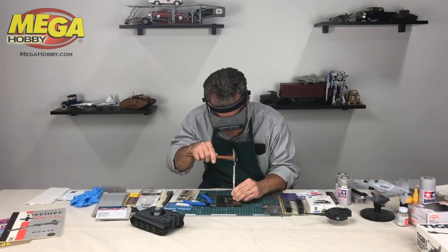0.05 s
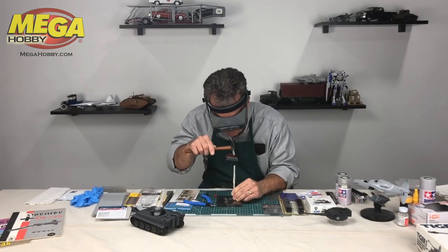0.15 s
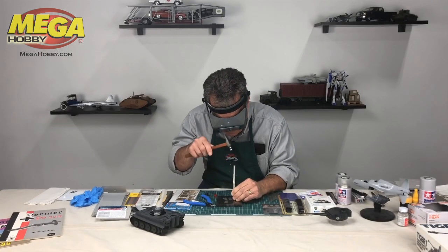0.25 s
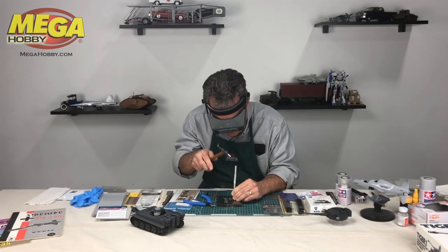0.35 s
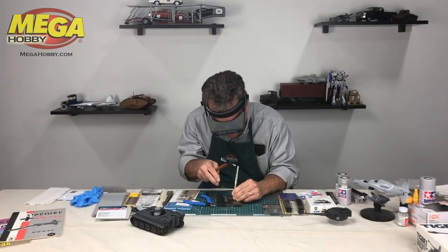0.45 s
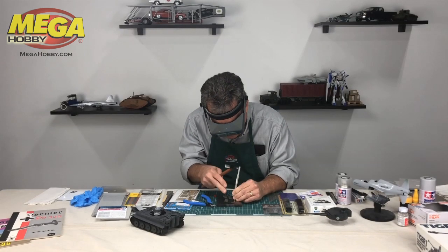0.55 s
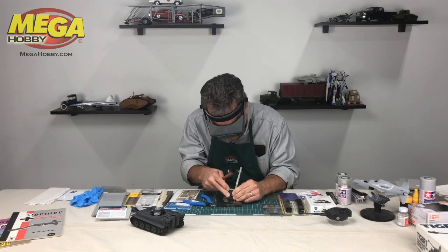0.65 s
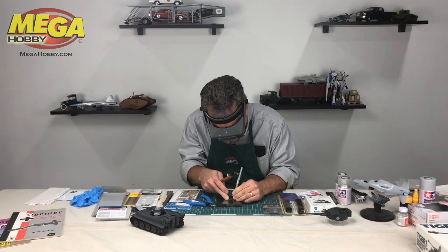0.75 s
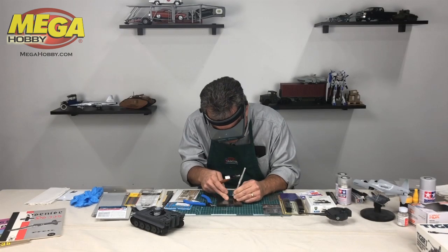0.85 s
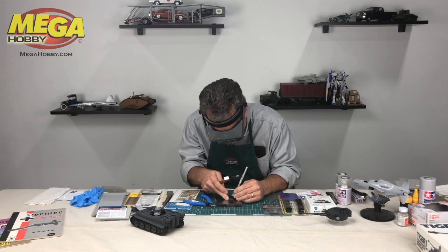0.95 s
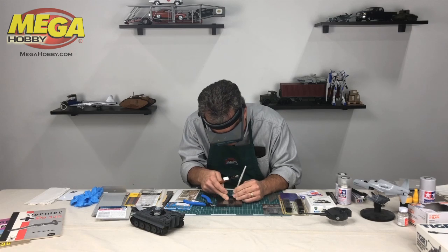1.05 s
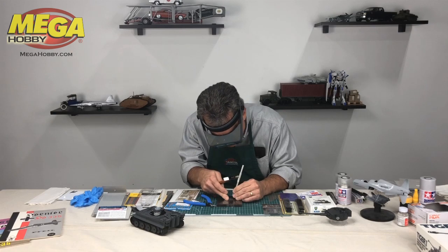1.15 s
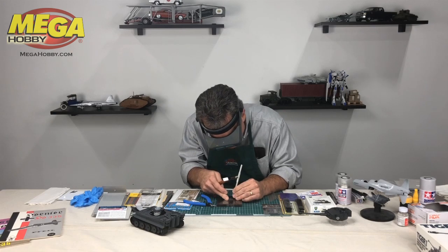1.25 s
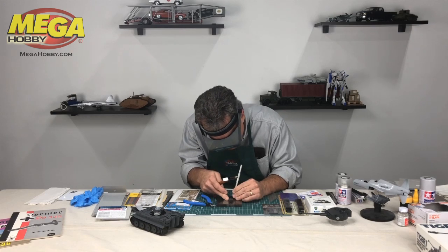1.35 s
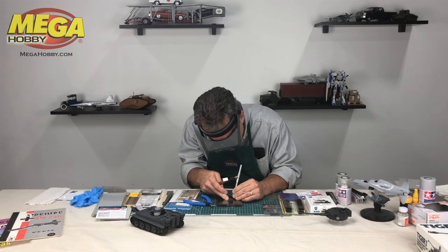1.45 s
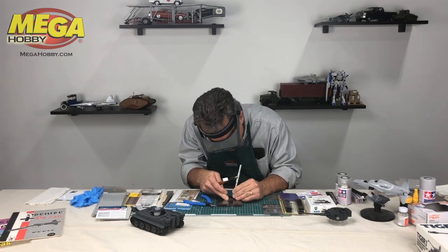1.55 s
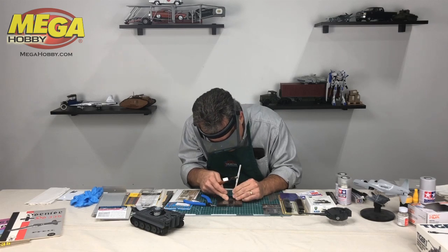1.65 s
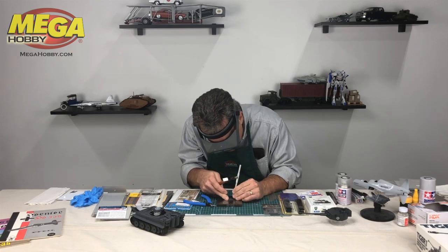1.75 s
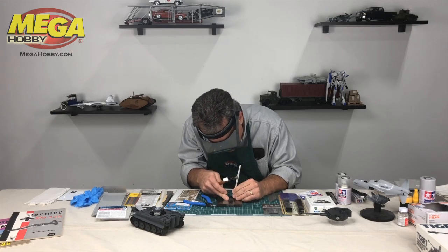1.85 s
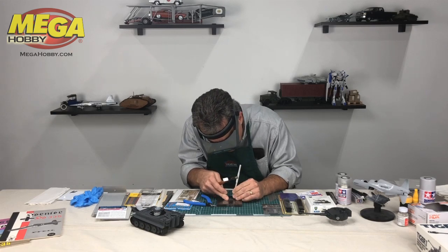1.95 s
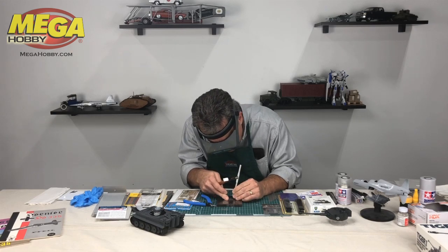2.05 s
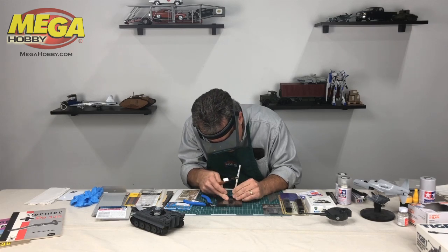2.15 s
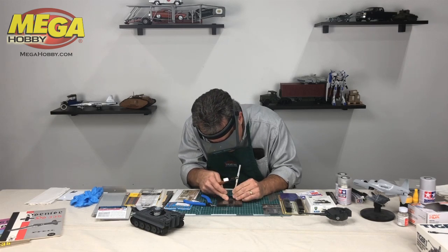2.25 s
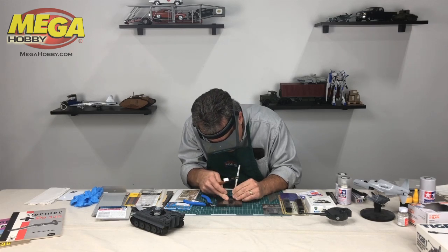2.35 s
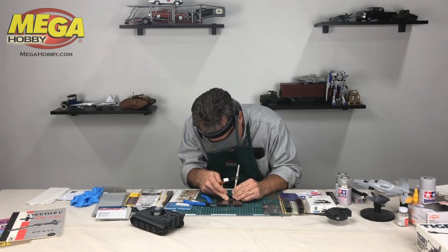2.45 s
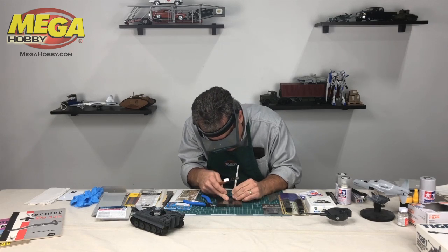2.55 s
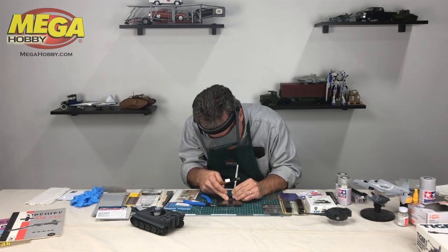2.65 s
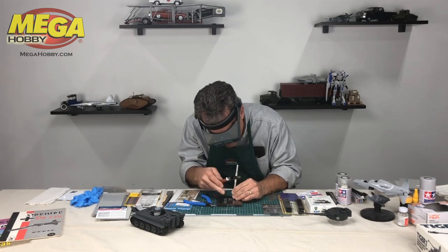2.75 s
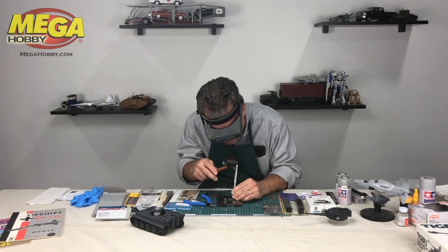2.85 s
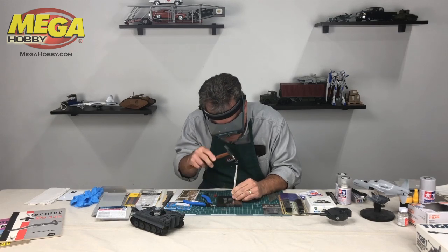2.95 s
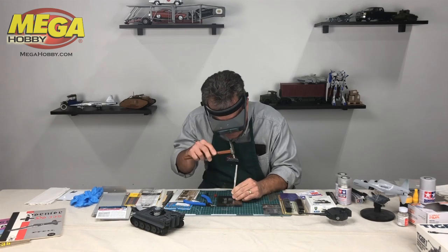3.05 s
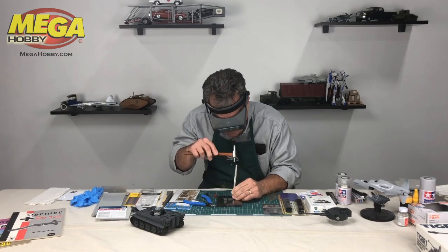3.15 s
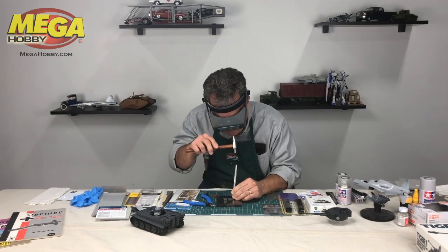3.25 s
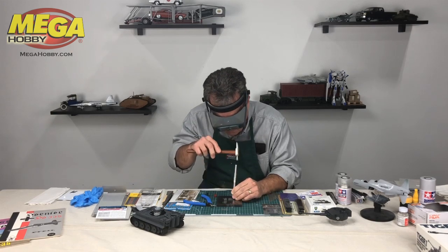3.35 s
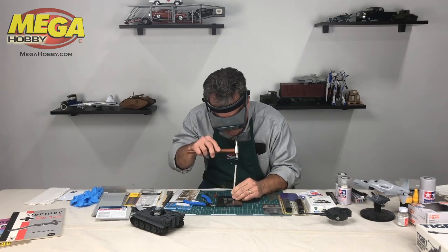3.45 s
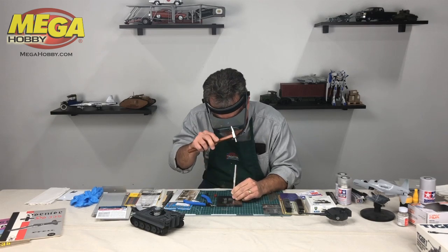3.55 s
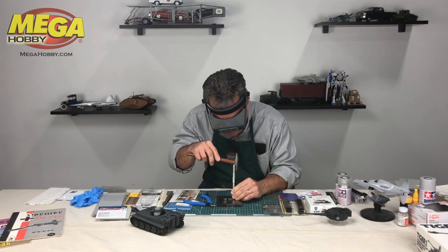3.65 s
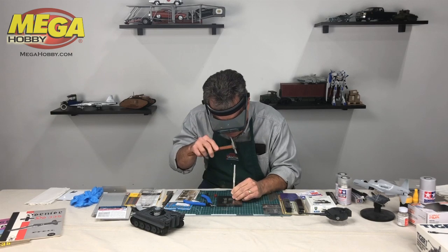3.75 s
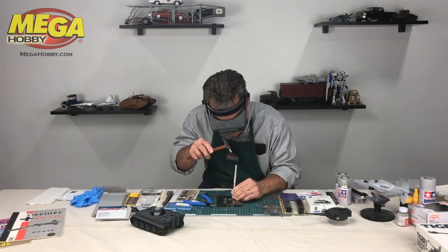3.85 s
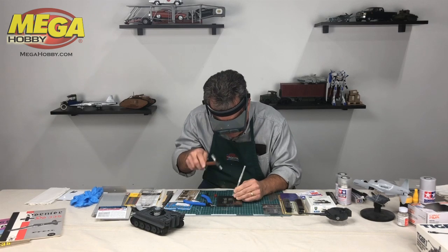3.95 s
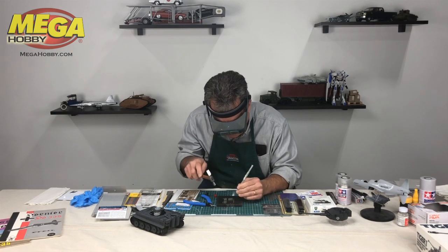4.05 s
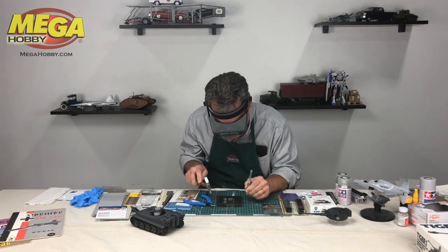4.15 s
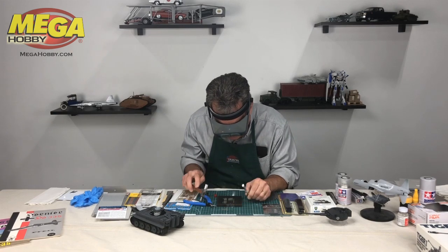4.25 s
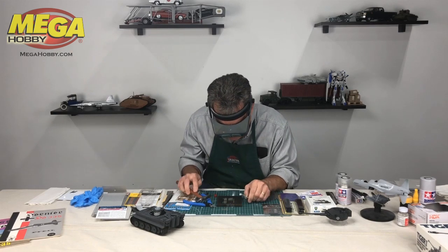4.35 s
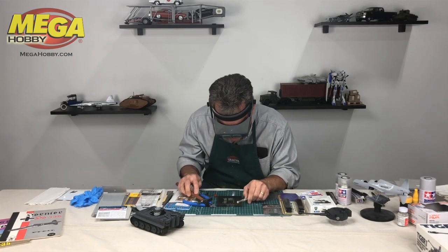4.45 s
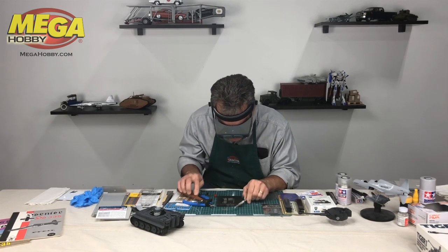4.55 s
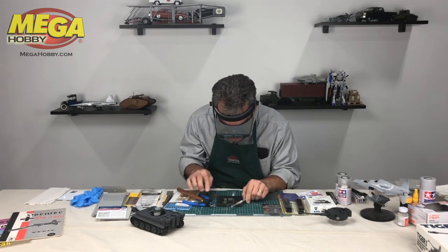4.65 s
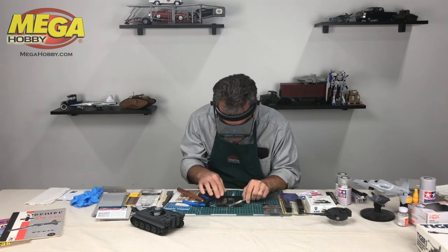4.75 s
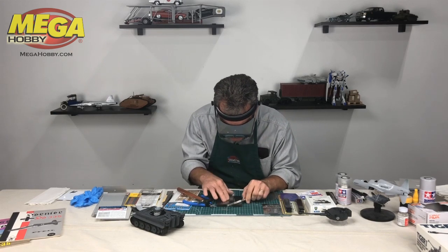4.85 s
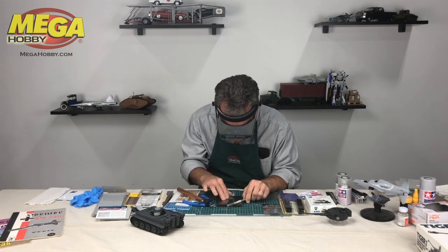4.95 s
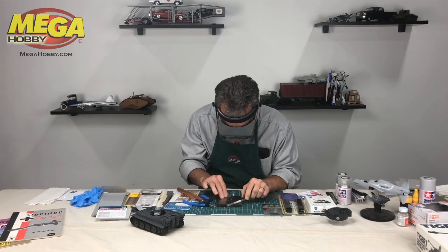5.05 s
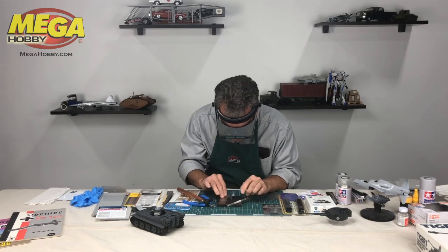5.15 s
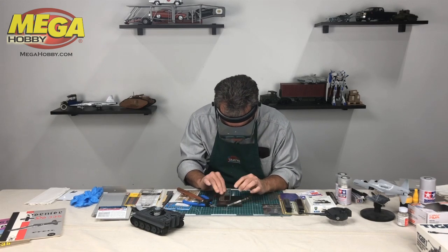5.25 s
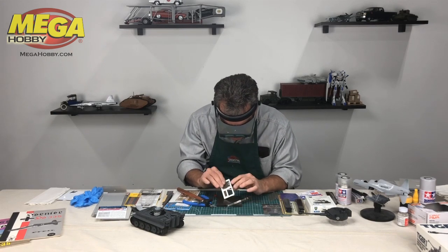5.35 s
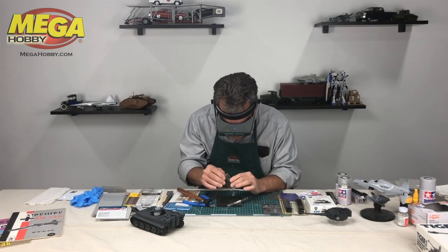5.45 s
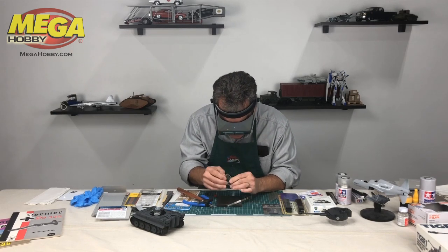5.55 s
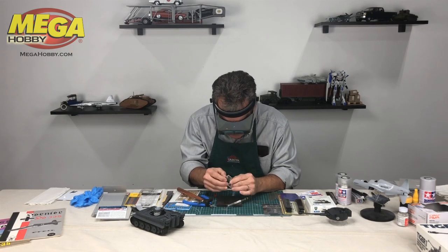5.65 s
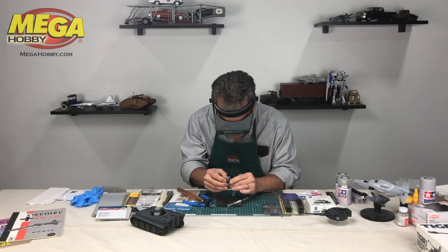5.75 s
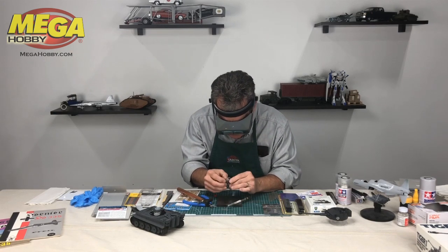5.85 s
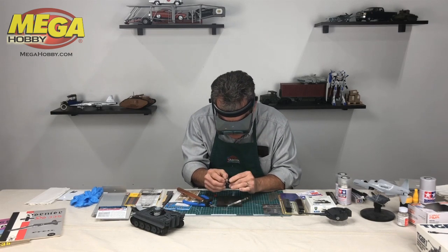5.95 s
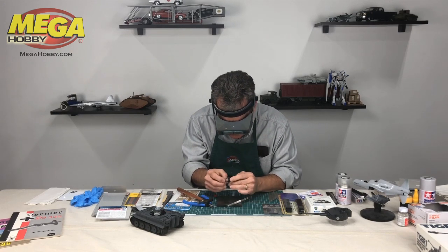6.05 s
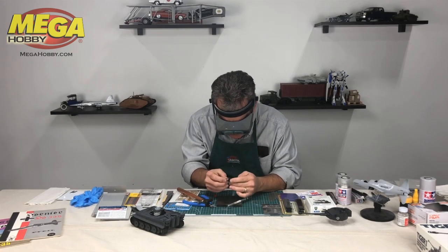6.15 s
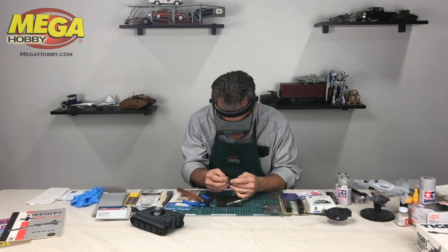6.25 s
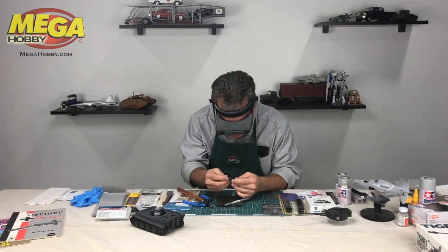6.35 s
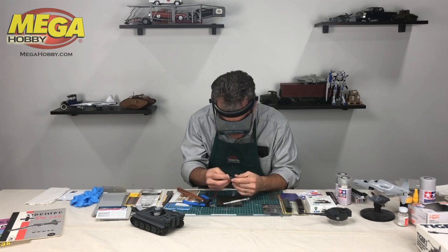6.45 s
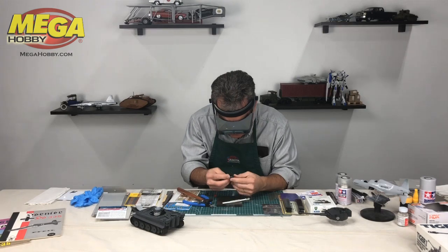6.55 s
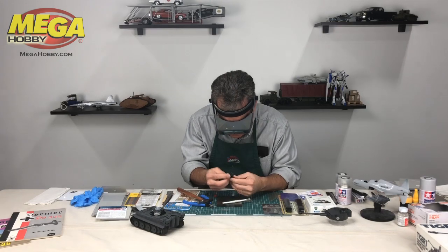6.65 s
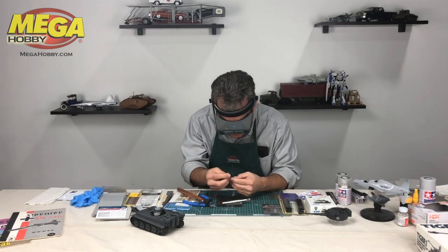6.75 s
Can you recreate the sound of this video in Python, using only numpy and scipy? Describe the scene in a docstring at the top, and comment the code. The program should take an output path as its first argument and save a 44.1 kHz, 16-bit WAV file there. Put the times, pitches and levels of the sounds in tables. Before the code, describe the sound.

A loud, dry steel crack with a brief bench boom opens the scene, clipped and harsh, its echo fading indoors. Tiny ticks and scrapes come after it, then almost three seconds of near silence. A lighter strike leads straight into another violent blow. Soft thuds and a bright metallic clink mark tools being put down on a mat, followed by very faint fiddling with thin metal, over steady low fan rumble and thin mains buzz.

```python
"""A workbench in a plain room: a small hammer drives a chisel blade onto a metal plate with three blows.
The hard blows overload the microphone. The blade ticks and chatters on the plate as short bursts and damped modes.
Then the tools are laid on a soft mat and rock to rest; fingers handle a small metal part, its modes muted and bent.
Noise-built echoes and a few standing waves answer from the room, over ventilation rumble and a faint mains buzz."""
import sys
import numpy as np
from scipy import signal
from scipy.fft import rfft, irfft
from scipy.io import wavfile
from scipy.ndimage import uniform_filter1d

SR = 44100
rng = np.random.default_rng(int(sys.argv[2]) if len(sys.argv) > 2 else 0)


def unload_wav(signal):
    """Save mono or channel-first audio to the path in sys.argv[1] as 16-bit WAV at rate SR, clipped to [-1, 1]."""
    wavfile.write(
        sys.argv[1],
        SR,
        np.round(np.clip(np.atleast_2d(signal).T, -1, 1) * 32767).astype(np.int16),
    )


N = 299747

# hammer blows: [t/s, plate knock level/dB, bench boom level/dB, steel crack level/dB, blade ring level/dB]
BLOWS = [(0.0454, 0.5, 2, 2.5, -30.5), (3.3975, -8.5, -10, -18, -26), (3.6429, 4.5, 2.5, 0.5, -22.5)]
# blade ticks on the plate, or chatters there after a hard blow:
# [t/s, crack level/dB, ring level/dB, gap between contacts/s, count of contacts]
TICKS = [(.056, -13, -34, .007, 1), (0.5697, -20.5, -31, .007, 1), (0.6561, -20, -31, 0.0065, 2),
         (3.651, -21, -31, .0052, 2), (3.671, -17, -38, 0.0082, 3)]
# tools and hands land on the mat:
# [t/s, knock level/dB, crack level/dB, handle ring level/dB, first gap/s, count of contacts]
LANDINGS = [(4.3129, -41.5, -62, -75, .017, 1), (4.320, -38.5, -64, -75, .018, 2),
            (4.406, -29.5, -41, -56, 0.017, 4), (4.516, -42, -60, -78, .017, 1),
            (4.566, -30, -29.5, -30, 0.0093, 2), (4.594, -34.5, -51, -62, .0145, 4),
            (4.662, -55, -49, -54, .017, 1), (4.7541, -43.5, -60, -72, .0342, 2),
            (6.332, -47, -60, -69.5, .028, 2)]
# fingers flick and drag the small metal part:
# [t/s, ring level/dB, muted pitch f/Hz, rise time/s, first gap/s, count of contacts]
TINKS = [(.781, -57.5, 3500, .003, .014, 3), (4.840, -53, 5000, 0.0047, .028, 1),
         (4.870, -50.5, 5000, 0.0014, 0.022, 3), (4.990, -50.5, 5000, 0.0053, .02, 1),
         (6.3319, -52, 3520, 0.00029, 0.011, 2), (6.4816, -62.5, 3440, .001, .02, 1),
         (6.5095, -59, 3430, .001, 0.021, 1), (6.621, -67, 5000, .003, .02, 1)]
# tools, fingers and sleeves slide: [t/s, length/s, level/dB, centre f/Hz, width/octaves]
SLIDES = [(0.65, 0.037, -45.5, 2130, 2.6), (0.712, .08, -57.5, 8850, 5), (0.755, 0.11, -59.5, 2880, 1.1),
          (2.75, 0.98, -66.5, 862, 1.95), (4.927, 0.3, -61, 1100, 2), (6.319, 0.37, -65, 521.5, 0.99)]
# damped modes of the metal plate: [f/Hz, level/dB, t60/s]
PLATE_MODES = [(430, 5, 0.0063), (623, -0.5, 0.016), (1028, -3, .011), (1177, 2, 0.0095),
               (2005, -15.5, .012)]
# damped modes of the chisel blade: [f/Hz, level/dB, t60/s]
BLADE_MODES = [(2030, -13, .025), (4400, -8, .011), (6120, -7, .009), (6750, -8, .012), (10400, -15, .08),
               (10420, -2, .018), (12750, -3, .016), (13050, -13, .035)]
# damped modes of the tool handles: [f/Hz, level/dB, t60/s]
HANDLE_MODES = [(1060, -3, .03), (2260, -7, .02), (3600, 2, .008), (4990, 3, .007), (6340, 2, .006),
                (8400, -3, .01)]
# damped modes of the small metal part: [f/Hz, level/dB, t60/s]
PART_MODES = [(1000, 0.5, 0.028), (2200, -5, 0.044), (3200, 0.5, .03), (3570, 5.5, 0.038), (5020, -5, 0.11),
              (6400, -4, 0.03), (8480, -1.5, 0.06), (9820, -7.5, 0.06)]
# damped modes of a landing on the mat: [f/Hz, level/dB, t60/s]
MAT_MODES = [(93, -13, 0.16), (194, -15.5, 0.21), (280, -7.5, 0.17), (353, -10, 0.082), (447, -4, 0.057),
             (538, -5.5, 0.064), (727, -3.5, 0.028), (1100, -3.5, 0.023), (1530, -8.5, 0.0031)]
# bending modes of the bench top: [f/Hz, level/dB]
BENCH_MODES = [(50, -21), (95, -17), (190, -13.5), (280, -11), (338, -17), (415, -12), (482, -9.5),
               (580, -23.5), (690, -26)]
# standing waves of the room: [f/Hz, level/dB, t60/s]
ROOM_MODES = [(196, -25, 0.49), (274, -27, 0.57), (364.6, -39.5, 0.79), (419, -36.5, 0.61),
              (479, -39.5, 0.63), (556, -41, 0.5), (618, -44.5, .55), (765, -48, 1)]
# spectrum of a steel contact: [f/Hz, level/dB]
CRACK_SPECTRUM = [(300, -22.5), (1200, -8), (2200, -6), (2900, -23), (4300, -6.5), (6500, -1.5), (8300, 1),
                  (10500, -4.5), (13000, -7), (16000, -19)]
# reverberation of the room by band: [f/Hz, level/dB, t60/s]
ROOM_BANDS = [(50, -15, 0.62), (129, -13, .55), (300, -11.5, 0.48), (473, -16.5, 0.78), (830, -12, 0.94),
              (1200, -23.5, 1), (1750, -22, .8), (2648, -21, 0.73), (4222, -20, 1), (7500, -21, .86),
              (10500, -21, 0.41), (12700, -20.5, .36), (15500, -27, .25)]
# ventilation and hiss: [f/Hz, level/dB per Hz]
AIR_SPECTRUM = [(15, -62.5), (45, -69.5), (58, -68), (72, -76), (110, -81), (200, -84), (300, -87.5),
                (450, -99), (700, -102.5), (1200, -108), (3000, -112), (8000, -117), (15500, -118.5)]
# fan hum: [f/Hz, rms level/dB]
FAN_HUM = [(59.2, -54), (179, -65), (300.5, -71)]
# switching edges of a lamp dimmer in each mains cycle: [share of the cycle, signed height]
DIMMER_EDGES = [(.18, -1), (.33, .65), (.695, 1), (.85, -.2)]

ROCK_SHRINK = 0.87  # a loose thing rocks to rest: each gap is this share of the one before


def undb(db):
    """Decibels to gain."""
    return 10 ** (np.asarray(db) / 20)


def seconds(length):
    """Time axis of a short sound."""
    return np.arange(int(length * SR)) / SR


def add(track, start, sound):
    """Mix a sound into a track at a given time."""
    i = max(int(start * SR), 0)
    track[i:i + len(sound)] += sound[:N - i]


def colour(x, spectrum):
    """Shape a sound by a spectrum of (f/Hz, level/dB), read on a log-frequency axis."""
    points = np.array(spectrum)
    hz = np.fft.rfftfreq(len(x), 1 / SR)
    level_db = np.interp(np.log(hz + 1e-9), np.log(points[:, 0]), points[:, 1])
    return irfft(rfft(x) * undb(level_db), len(x))


def ventilation(waver=0.089):
    """Noise gives the rumble and hiss; sines that drift in level and phase give the fan hum."""
    t = np.arange(N) / SR
    air = colour(rng.standard_normal(N), AIR_SPECTRUM) * np.sqrt(SR / 2)  # to density per Hz
    for hz, db in FAN_HUM:
        drift = np.interp(t, np.linspace(0, t[-1], num=30), rng.standard_normal(30))
        amplitude = undb(db) * np.sqrt(2) * (1 + waver * drift)
        air += amplitude * np.sin(2 * np.pi * hz * t + drift)
    return air


def mains_buzz(db=-51, mains_hz=60, relax_hz=130, dull_hz=11000):
    """Dimmer edges leak into the microphone line as small steps that relax."""
    edges = np.zeros(N)
    cycles = np.arange(int(N / SR * mains_hz))
    for share, height in DIMMER_EDGES:
        at = ((cycles + share) * SR / mains_hz).astype(int)
        edges[at] += height
    steps = signal.lfilter([1], [1, -np.exp(-2 * np.pi * relax_hz / SR)], edges)
    return undb(db) * signal.lfilter(*signal.butter(1, dull_hz, fs=SR), steps)


def ring(modes):
    """Damped modes after one push."""
    t = seconds(1)
    return -sum(undb(db - 60 * t / t60) * np.sin(2 * np.pi * hz * t) for hz, db, t60 in modes)


def bench_boom(peak_s=0.012, sharpness=2.5):
    """Bending waves spread through the bench top, so its boom swells after the knock."""
    t = seconds(1 / 8)
    swell = (t / peak_s * np.exp(1 - t / peak_s)) ** sharpness
    return -swell * sum(undb(db) * np.sin(2 * np.pi * hz * t) for hz, db in BENCH_MODES)


def crack(t60, rattle_db, rattle_t60):
    """Hard contact: a short burst that holds every pitch evenly, and a weaker rattle behind it."""
    t = seconds(1 / 8)
    burst, rattle = rng.standard_normal((2, len(t)))
    fade = undb(-60 * t / t60)
    # keep the phases of the fading burst, level its spectrum
    phase = np.angle(rfft(burst * fade))
    even = irfft(np.exp(1j * phase), len(t)) * np.linalg.norm(fade)
    fading_rattle = rattle * undb(rattle_db - 60 * t / rattle_t60)
    contact = colour(even * np.sqrt(fade) + fading_rattle, CRACK_SPECTRUM)
    return contact[:len(t) // 2]


def hammer(bite_s=0.0008):
    """Each blow knocks plate, blade and bench; the steel cracks as the edge bites through."""
    blows = np.zeros(N)
    plate, boom, blade = ring(PLATE_MODES), bench_boom(), ring(BLADE_MODES)
    for start, knock_db, boom_db, crack_db, ring_db in BLOWS:
        add(blows, start, undb(knock_db) * plate + undb(ring_db) * blade)
        add(blows, start, undb(boom_db) * boom)
        add(blows, start + bite_s, undb(crack_db) * crack(t60=0.011, rattle_db=-19.5, rattle_t60=0.044))
    return blows


def near_echoes(x, db=-16, build_s=0.0027, t60=0.09, low_hz=700, high_hz=6000):
    """The wall, shelves and clutter on the bench scatter a first quick spray of echoes."""
    t = seconds(1 / 4)
    band = signal.butter(1, [low_hz, high_hz], "bandpass", fs=SR)
    build = 1 - np.exp(-(t / build_s) ** 2)
    spray = rng.standard_normal(len(t)) * undb(-60 * t / t60) * build
    response = signal.lfilter(*band, spray / np.linalg.norm(spray))
    return undb(db) * signal.fftconvolve(x, response)[:N]


def room(x, build_s=0.0047):
    """Diffuse echoes build up and die away at a different pace in each band, soonest at the very top."""
    t = seconds(3 / 2)
    noise = rfft(rng.standard_normal(len(t)))
    log_hz = np.log(np.fft.rfftfreq(len(t), 1 / SR) + 1)
    log_centres = np.log(np.array(ROOM_BANDS)[:, 0])
    build = 1 - np.exp(-(t / build_s) ** 2)
    response = np.zeros(len(t))
    for k, (_, db, t60) in enumerate(ROOM_BANDS):
        # triangular share of the noise, overlapping the neighbouring bands
        share = np.interp(log_hz, log_centres, np.arange(len(ROOM_BANDS)) == k)
        fade = undb(-60 * t / t60) * build
        response += undb(db) * irfft(noise * share, len(t)) * fade / np.linalg.norm(fade)
    return signal.fftconvolve(x, response)[:N]


def contacts(start, gap, shrink, count):
    """Numbered times of a run of rebounds; each gap is a share of the one before."""
    gaps = gap * shrink ** np.arange(round(count))
    return enumerate(start + np.cumsum(gaps) - gaps)


def blade_ticks(loss_db=3.5):
    """The blade touches too lightly to move the bench; held down, it rebounds evenly, weaker each time."""
    ticks, blade = np.zeros(N), ring(BLADE_MODES)
    for start, crack_db, ring_db, gap, count in TICKS:
        for k, s in contacts(start, gap, 1, count):
            tick = crack(t60=0.008, rattle_db=-19.5, rattle_t60=0.03)
            add(ticks, s, undb(crack_db - k * loss_db) * tick)
            add(ticks, s, undb(ring_db - k * loss_db) * blade)
    return ticks


def standing_waves(delay_s=0.02):
    """The boom of the bench sets low room modes humming just after each blow."""
    hum, modes = np.zeros(N), ring(ROOM_MODES)
    for start, _, boom_db, _, _ in BLOWS:
        add(hum, start + delay_s, undb(boom_db) * modes)
    return hum


def rub(length, centre_hz, octaves, grain_db=4, patchy_db=2, skew=0.45):
    """Dense slips that catch unevenly, swell quickly and fade slowly."""
    slips = rng.standard_normal(SR) * undb(grain_db * rng.standard_normal(SR))
    hz = np.fft.rfftfreq(SR, 1 / SR) + 1
    band = np.exp(-0.5 * (np.log2(hz / centre_hz) / octaves) ** 2)
    tilt = np.sqrt(1 + hz / centre_hz)  # takes the top down
    friction = irfft(rfft(slips) * band / tilt)
    t = seconds(min(length, 1))
    grip = uniform_filter1d(rng.standard_normal(SR), size=500)
    patches = undb(patchy_db * grip[:len(t)] / grip.std())
    stroke = np.sin(np.pi * (t / length) ** skew) ** 2
    return friction[:len(t)] / friction.std() * stroke * patches


def slides():
    """The blade scrapes over the plate; fingers and sleeves brush the bench: all bands of friction noise."""
    rubs = np.zeros(N)
    for start, length, db, centre_hz, octaves in SLIDES:
        add(rubs, start, undb(db) * rub(length, centre_hz, octaves))
    return rubs


def tink(muted_hz, mute_db=-17, mute_octaves=0.098, grip_bend=0.022, bend_s=0.012, touch_db=-7, uneven_db=3):
    """Thin metal touched once; the grip mutes modes near one pitch and bends them all as it shifts."""
    t = seconds(1 / 4)
    sound = np.zeros(len(t))
    touch = crack(t60=0.014, rattle_db=-15, rattle_t60=0.04)
    sound[:len(touch)] = undb(touch_db) * touch
    variations = rng.standard_normal((len(PART_MODES), 2))
    for (hz, db, t60), (size, bend) in zip(PART_MODES, variations):
        muted_db = mute_db * np.exp(-(np.log2(hz / muted_hz) / mute_octaves) ** 2)
        pitch = hz * (1 + grip_bend * bend * np.exp(-t / bend_s))
        level = undb(db + uneven_db * size + muted_db - 60 * t / t60)
        sound += level * np.sin(2 * np.pi * np.cumsum(pitch) / SR)
    return sound


def small_part(loss_db=2.5):
    """The small part tinks and rebounds, each contact weaker and sooner after the last."""
    tinks, t = np.zeros(N), seconds(1 / 4)
    for start, level_db, muted_hz, rise_s, gap, count in TINKS:
        rise = 1 - np.exp(-t / rise_s)
        for k, s in contacts(start, gap, ROCK_SHRINK, count):
            add(tinks, s, undb(level_db - k * loss_db) * tink(muted_hz) * rise)
    return tinks


def squeak(start=4.247, length=0.032, rest_hz=1580, drop_hz=900, settle_s=0.00302, db=-59):
    """A tiny falling squeak as the grip shifts."""
    out, t = np.zeros(N), seconds(length)
    pitch = rest_hz + drop_hz * np.exp(-t / settle_s)
    swell = np.sin(np.pi * t / length)
    add(out, start, undb(db) * swell * np.sin(2 * np.pi * np.cumsum(pitch) / SR))
    return out


def mat_knock(place_db=3, detune=0.079):
    """One landing on the soft cutting mat; each spot shifts its modes a little in pitch and level."""
    spot = rng.standard_normal((len(MAT_MODES), 2))
    modes = []
    for (hz, db, t60), (shift, size) in zip(MAT_MODES, spot):
        modes.append((hz * (1 + detune * shift), db + place_db * size, t60))
    return ring(modes)


def tools_laid_down(dull_hz=14000, scuff_db=-15.5, scuff_lead_s=0.01):
    """Heads and handles scuff the mat, land on it and rock to rest, the ringing lost first."""
    landings, handle = np.zeros(N), ring(HANDLE_MODES)
    knock_loss_db, crack_loss_db, ring_loss_db = 2, 2.5, 8  # from one contact to the next
    for start, knock_db, crack_db, ring_db, gap, count in LANDINGS:
        scuff = rub(length=0.1, centre_hz=480, octaves=1.0)
        add(landings, start - scuff_lead_s, undb(knock_db + scuff_db) * scuff)
        for k, s in contacts(start, gap, ROCK_SHRINK, count):
            contact = crack(t60=0.012, rattle_db=-3, rattle_t60=0.034)
            add(landings, s, undb(knock_db - k * knock_loss_db) * mat_knock())
            add(landings, s, undb(ring_db - k * ring_loss_db) * handle)
            add(landings, s, undb(crack_db - k * crack_loss_db) * contact)
    return signal.lfilter(*signal.butter(1, dull_hz, fs=SR), landings)


def scene():
    """The work at the bench, its room and the steady background."""
    background = ventilation() + mains_buzz()
    work = hammer() + blade_ticks() + slides() + small_part() + squeak() + tools_laid_down()
    echoes = near_echoes(work) + room(work) + standing_waves()
    return (background + work + echoes)[None]


def record(dry, soft_hz=15000, top_hz=16300):
    """The microphone clips at full scale; the top is softened, then cut."""
    clipped = np.clip(dry, -1, 1)
    softened = signal.lfilter(*signal.butter(2, soft_hz, fs=SR), clipped)
    return signal.sosfilt(signal.ellip(10, 0.1, 90, top_hz, fs=SR, output="sos"), softened)


dry = scene()
out = record(dry)
unload_wav(out)
```